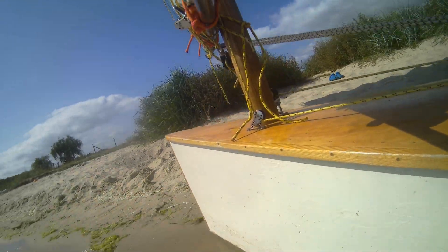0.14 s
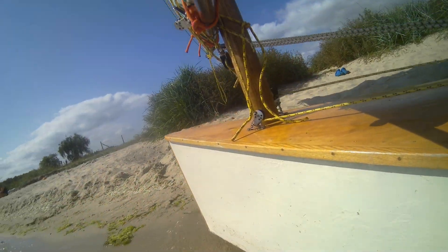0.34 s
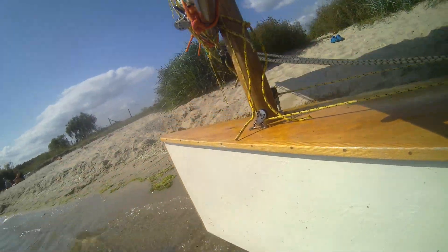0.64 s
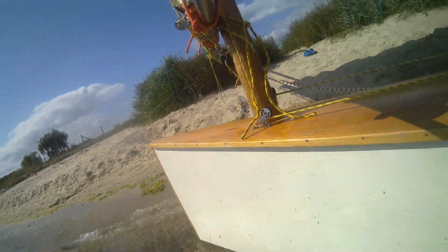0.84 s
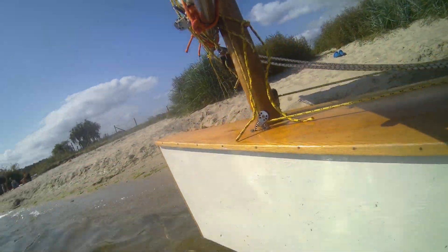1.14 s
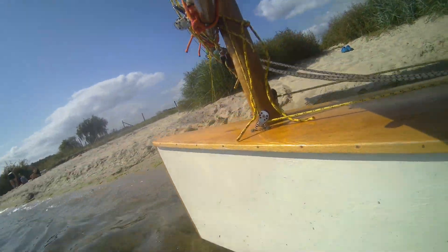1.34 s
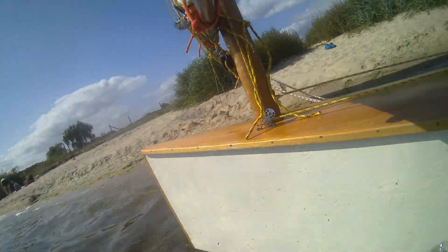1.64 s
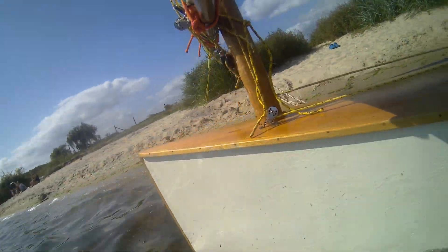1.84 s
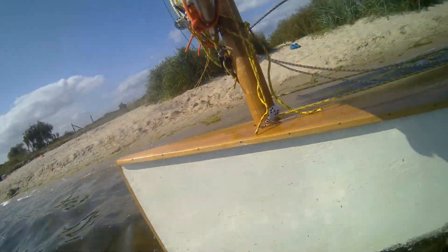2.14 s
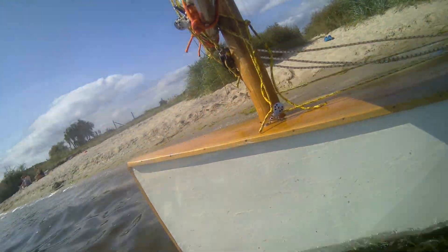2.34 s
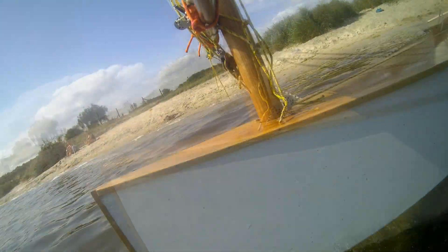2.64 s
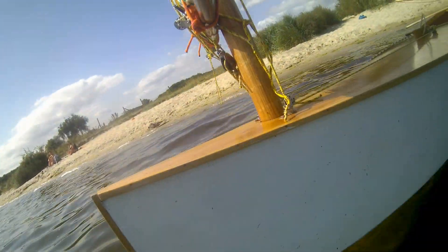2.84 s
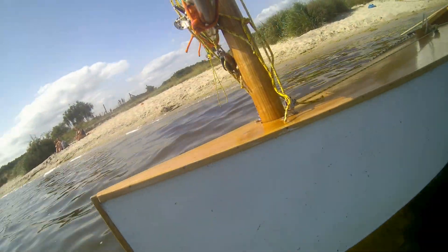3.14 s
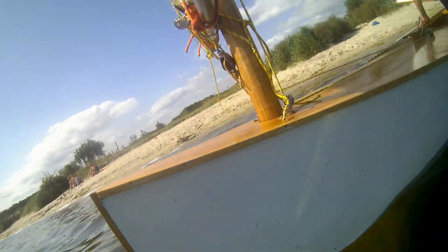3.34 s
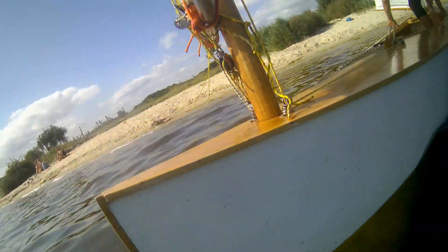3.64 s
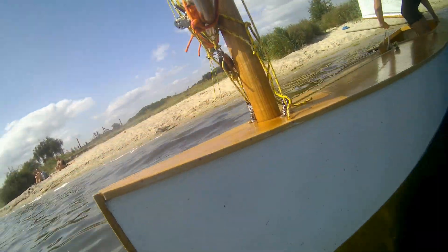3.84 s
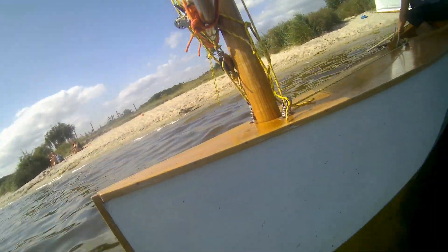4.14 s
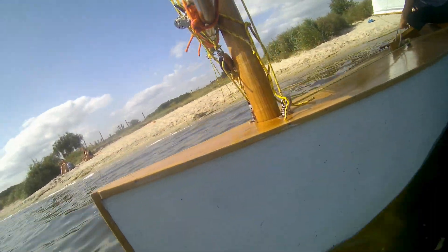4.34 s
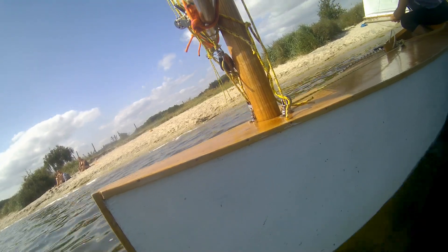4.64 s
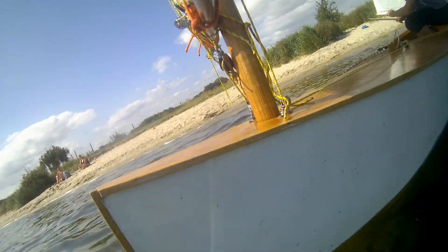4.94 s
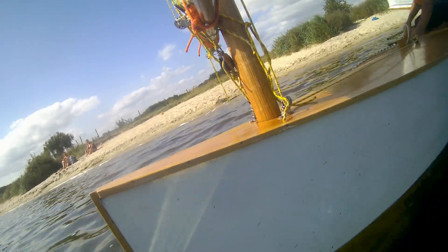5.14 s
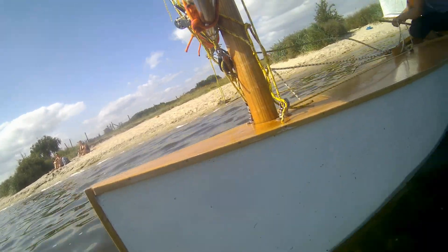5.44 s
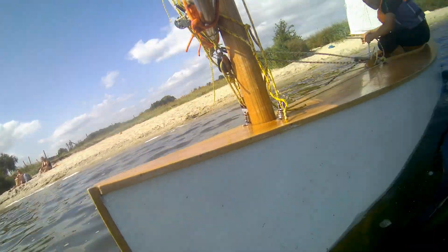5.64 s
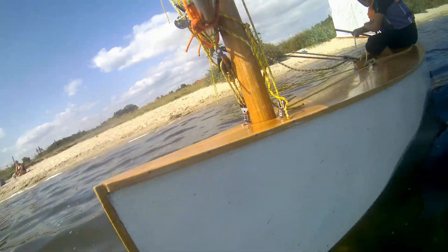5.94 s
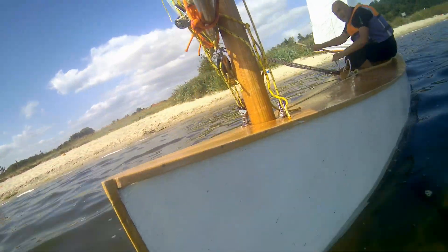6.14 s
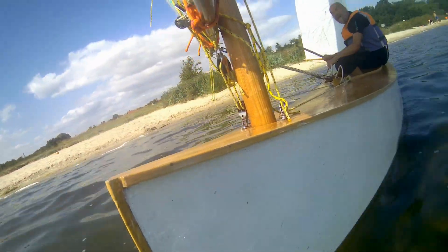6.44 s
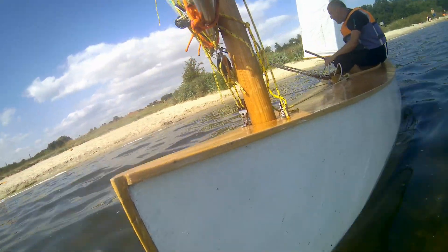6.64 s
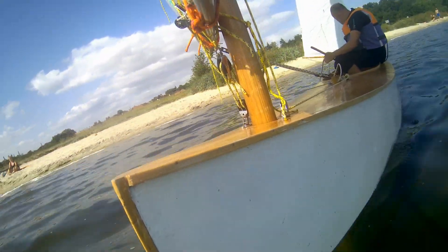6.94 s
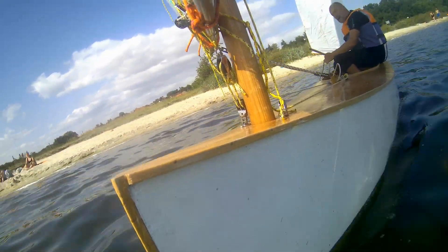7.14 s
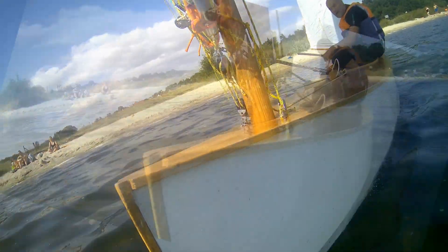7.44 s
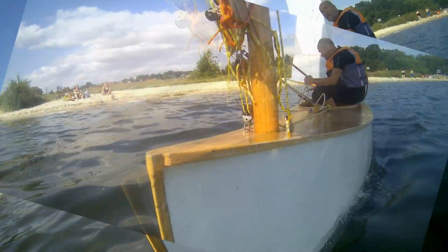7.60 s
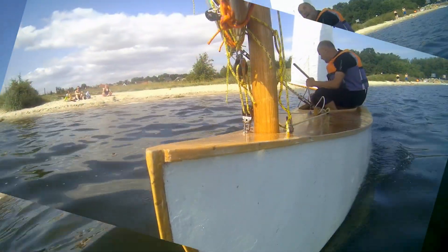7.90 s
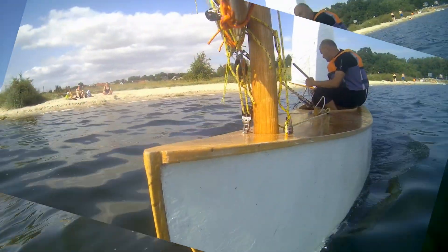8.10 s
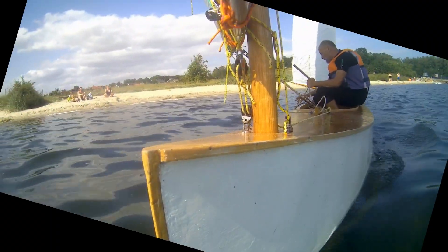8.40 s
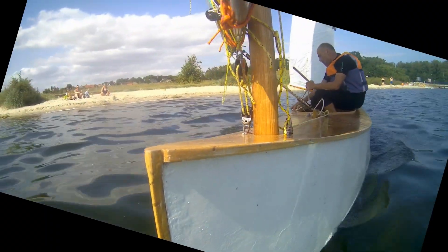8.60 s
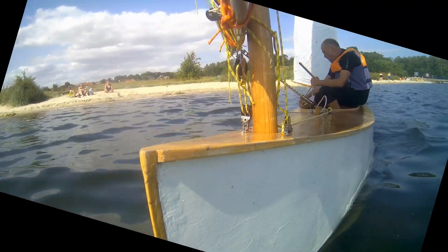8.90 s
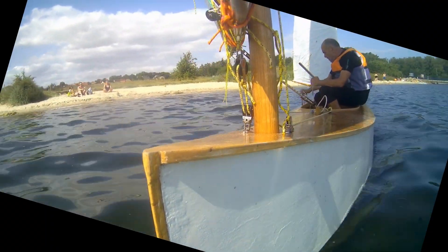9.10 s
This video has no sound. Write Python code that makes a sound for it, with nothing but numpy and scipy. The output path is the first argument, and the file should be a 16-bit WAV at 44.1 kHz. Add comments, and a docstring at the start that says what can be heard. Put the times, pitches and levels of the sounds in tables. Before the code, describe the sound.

Close, muffled handling sounds travel through the hull and mount of a small boat leaving a beach. Low scuffs and soft bumps come first, then a busy cluster of sharp ticks and dragging, more knocks, and a brief lull. Afloat, jolts set off short, very deep wobbling booms with hollow knocks. The treble drops out before the end; a barely audible hiss lies beneath.

```python
"""At the bow of a small wooden boat pushed off a beach, a sealed camera on a pole hears through its mount.
Dull bumps are soft pushes, sharp ticks are short cracks, and rubbing is gritty noise.
All three set the modes (natural tones) of the housing and mount ringing.
Once the boat is afloat, jolts make the pole sway with a deep boom: wandering sines over a low shudder.
A faint hiss of steady coloured noise lies below."""
import sys
import numpy as np
from scipy import signal
from scipy.fft import rfft, irfft
from scipy.io import wavfile

SR = 44100
rng = np.random.default_rng(int(sys.argv[2]) if len(sys.argv) > 2 else 0)


def gain_from_decibels(decibels):
    """Convert decibel values to linear amplitude factors."""
    exponent = np.asarray(decibels, float) / 20
    return 10 ** exponent


def generate_wav(sig):
    """Save sig (samples, or channels by samples) to the path in sys.argv[1] as 16-bit PCM at SR."""
    pcm = np.round(np.clip(np.atleast_2d(sig).T, -1, 1) * 32767).astype(np.int16)
    wavfile.write(sys.argv[1], SR, pcm)


N = 408525   # length in samples

LOW_BELOW_HZ, TREBLE_ABOVE_HZ = 500, 4300   # the modes fall into low, middle and treble


def in_time(rows):
    """Draws straight lines between the rows of a curve, giving each column at every sample."""
    s, *columns = np.transpose(rows)
    return [np.interp(np.arange(N) / SR, s, column) for column in columns]


def rms_one(x):
    """Scales a signal to an rms (average strength) of 1."""
    return x / np.sqrt(np.mean(x ** 2) + 1e-20)


def flicker(rate_hz):
    """Wanders by chance: straight lines join random points of spread 1, rate_hz points a second."""
    points = rng.standard_normal(int(N / SR * 200) + 2)
    return np.interp(np.arange(N) / SR * rate_hz, np.arange(len(points)), points)


def ring(force, hz, t60):
    """Rings one mode: a unit click starts a sine of height 1 that fades by 60 dB in t60 seconds."""
    shrink, turn = gain_from_decibels(-60 / (t60 * SR)), 2 * np.pi * hz / SR   # per sample
    return signal.lfilter([0, np.sin(turn)], [1, -2 * shrink * np.cos(turn), shrink ** 2], force + 1e-18)


def peaked(s, rise_s, fade_s):
    """Gain that swells to 1 at s and dies away, straight in dB; the times are for 20 dB."""
    age = np.arange(N) / SR - s
    level_db = np.where(age < 0, 20 * age / abs(rise_s), -20 * age / abs(fade_s))
    return gain_from_decibels(np.maximum(level_db, -200))


def hiss():
    """Steady coloured noise of the microphone and the air."""
    # Colour of the hiss. Each row: frequency in Hz, relative level in dB per Hz.
    colour_rows = [(30, -26), (60, 1), (270, 2), (1070, -3), (3700, -13), (6000, -20.5), (14000, -20),
                   (16000, -34.5)]
    hz, level_db = np.transpose(colour_rows)
    bins = np.fft.rfftfreq(N, 1 / SR) + 1
    colour = gain_from_decibels(np.interp(np.log(bins), np.log(hz), level_db))
    noise = irfft(colour * rfft(rng.standard_normal(N)), N)
    return gain_from_decibels(-75) * rms_one(noise)


def sway():
    """Each jolt starts a swing of its own, a near sine whose pitch wanders, with a rough shudder under it."""
    # Jolts that set the pole swaying. Each row: start in seconds, pitch in Hz, rms level of the swing in dB,
    # seconds held, seconds to fade 20 dB (signs of the times are ignored).
    jolts = [(6.965, 33, -34.5, 0.018, 0.38), (7.12, 48, -37, 0.084, -0.1), (7.411, 46.1, -43.5, 0.059, .1),
             (7.619, 43.2, -29.5, 0.06, 0.02), (7.71, 46.2, -35, 0.056, .16),
             (7.909, 44.4, -42.5, 0.016, 0), (7.99, 45.86, -46.5, 0.077, -0.5), (8.139, 46.4, -46, .1, 0.3),
             (8.3, 36.3, -42, 0.08, 0.26), (8.71, 46.3, -44.5, 0.1, .15), (8.935, 47.8, -35, 0.021, 0.16)]
    climb_hz_per_s, swell_s = 12, 0.024   # pitch climbs as the swing dies; time to swell 20 dB
    t, wander = np.arange(N) / SR, 1 + 0.04 * flicker(11)
    swing, power = np.zeros(N), np.zeros(N)
    for s, hz, db, held_s, fade_s in jolts:
        end = s + abs(held_s)
        held_then_fading = np.where(t < end, 1, peaked(end, 1, fade_s))
        size = gain_from_decibels(db) * np.where(t < s, peaked(s, swell_s, 1), held_then_fading)
        pitch = hz + climb_hz_per_s * np.clip(t - s, 0, .5)
        turns = np.cumsum(pitch * wander) / SR
        swing += np.sqrt(2) * size * np.cos(2 * np.pi * (turns - turns[int(s * SR)]))
        power += size ** 2
    band = signal.butter(5, [24., 64.], "band", fs=SR, output="sos")
    shudder = rms_one(signal.sosfilt(band, rng.standard_normal(N)))
    return swing + gain_from_decibels(-6.5) * np.sqrt(power) * shudder


def grit(per_s, spread_db, smooth_db, catch_s):
    """Catches of uneven size, each a short rasp, come at random over a smooth friction noise."""
    sizes = gain_from_decibels(spread_db * np.minimum(rng.exponential(1, N), 4))
    chance = per_s * gain_from_decibels(4.0 * flicker(25)) / SR   # the rate of catches wanders about per_s
    catches = sizes * (rng.random(N) < chance)
    pressure = signal.lfilter([1], [1, -np.exp(-1 / (catch_s * SR))], catches + 1e-18)
    return (rms_one(pressure) + gain_from_decibels(smooth_db)) * rng.standard_normal(N)


def rubbing_db():
    """Adds the power of the steady drag and all scuffs, giving low, middle and treble levels in dB."""
    # Steady drag on sand and through water, before the mode levels.
    # Each row: time in seconds, low level in dB, middle level in dB, treble level in dB.
    drag = [(0, -46.5, -57, -71), (.7, -63, -68.5, -84), (1.29, -53.5, -65, -78.5),
            (1.86, -47.5, -57.5, -68.5), (1.96, -42.5, -54.5, -67.5), (2.09, -46, -59, -68.5),
            (2.16, -37.5, -46.5, -67), (2.55, -42.5, -56, -64.5), (2.68, -61, -65, -70.5),
            (2.86, -37.5, -46.5, -68.5), (2.96, -60, -67, -75.5), (3.9, -55, -73, -82),
            (4.33, -52, -62, -80), (5.0, -79, -92, -100), (5.4, -77, -78.5, -90), (5.49, -48.5, -54, -78.5),
            (5.98, -60.5, -80, -82.5), (6.32, -77, -81.5, -81.5), (6.9, -56.5, -79, -84.5),
            (7.1, -66.5, -64, -92), (8.46, -80, -67.5, -90), (8.68, -80, -82.5, -99),
            (8.8, -80.5, -66, -99), (9.26, -68, -82.5, -100)]
    # Single scuffs of rope, hand and deck, before the mode levels. Each row: peak time in seconds,
    # low level in dB, seconds for the low part to fade 20 dB (sign ignored for the fade),
    # middle level in dB above the low one, treble level in dB above the low one.
    scuffs = [(0.149, -35.5, -0.02, -10, -39), (.32, -43, 0.41, -10.5, -28.5), (0.574, -50, 0.25, -2, -15),
              (0.617, -38, 0.07, -14.5, -17), (0.797, -47.5, 0.3, -10, -19.5),
              (0.997, -44.5, 0.25, -10.5, -18.5), (1.238, -55, -0.44, -3, -15.5),
              (2.581, -39, 0.22, -5.5, -24.5), (3.09, -36.5, 0.6, -6, -24.5),
              (3.456, -34.5, 0.09, -13.5, -38), (3.539, -35.5, 0.04, -11, -31),
              (3.66, -43.5, 1.16, -11, -32.5), (3.967, -37, 0.24, -11, -30.5),
              (4.233, -41.5, -0.23, -12, -34), (4.56, -52.5, -1, -10.5, -26.5),
              (5.095, -47.5, 0.15, -10.5, -25), (5.242, -51, 0.2, -3.5, -25),
              (5.306, -35.5, 0.07, -13.5, -40.5), (5.426, -39.5, 0.19, -7.5, -31),
              (5.681, -47, 0.31, -7, -29), (6.029, -32.5, 0.11, -11, -29.5), (6.162, -43, 0.1375, -10, -38),
              (6.357, -52.5, 0.33, -7.5, -19), (6.43, -51.5, 0.36, -12.5, -28), (6.63, -51, 0.13, -10, -27),
              (6.963, -38.5, 0.21, -11.5, -41.5), (7.348, -42.5, 0.22, -15, -30.5),
              (7.505, -38, 0.08, -5, -25), (7.616, -48.5, 0.6, -6.5, -33), (7.67, -48, 0.65, -27, -27),
              (7.964, -46.5, 0.34, -8, -26), (8.051, -62, 0.02, 7, -27), (8.195, -43, 0.21, -15.5, -30),
              (8.348, -37.5, 0.13, -15, -31), (8.71, -67.5, 0.7, -2, -35.5),
              (8.918, -60.5, 0.36, -3.5, -36)]
    rise_s, rise_share = 0.038, 0.013   # seconds to rise 20 dB, plus this share of the signed fade
    dulls = 1.24   # middle and treble rise and fade this much faster
    power = gain_from_decibels(np.array(in_time(drag))) ** 2
    for s, low_db, fade_s, middle_db, treble_db in scuffs:
        shape = peaked(s, rise_s + rise_share * fade_s, fade_s) ** 2
        power[0] += gain_from_decibels(low_db) ** 2 * shape
        upper_db = low_db + np.array([[middle_db], [treble_db]])
        power[1:] += gain_from_decibels(upper_db) ** 2 * shape ** dulls
    return 10 * np.log10(power)


def bumps(hz):
    """Soft pushes of a few ms that mostly reach the low modes, each with a strength of its own."""
    # Dull bumps. Each row: start in seconds, strength in dB before chance and the mode levels.
    bump_rows = [(0.069, -32), (0.109, -28.5), (0.144, -26), (0.277, -31), (0.316, -31), (0.422, -32.5),
                 (0.559, -27.5), (0.599, -28.5), (0.622, -35), (0.791, -38), (1.219, -38), (1.559, -32.5),
                 (1.774, -29), (1.806, -35.5), (2.173, -28.5), (2.275, -32), (2.472, -32.5), (2.593, -33),
                 (2.705, -32), (3.073, -29.5), (3.187, -31), (3.218, -26), (3.329, -28.5), (3.456, -36.5),
                 (3.535, -29), (3.642, -30), (3.962, -35), (4.014, -29), (4.19, -31.5), (4.235, -33),
                 (4.404, -45), (4.559, -43), (5.094, -33.5), (5.227, -39.5), (5.305, -45), (5.421, -30.5),
                 (6.039, -32.5), (6.148, -32.5), (6.413, -27.5), (6.61, -37), (6.941, -25), (7.495, -27),
                 (8.327, -28), (8.709, -49.5), (8.909, -44)]
    s, strength_db = np.transpose(bump_rows)
    force = np.zeros(N)
    force[(s * SR).astype(int)] = gain_from_decibels(strength_db - 4.5 + rng.normal(0, 1.88, len(s)))
    push = np.sin(2 * np.pi * hz * np.arange(int(1.5 * SR / hz)) / SR)   # one and a half cycles
    return signal.fftconvolve(force, push * 2 / len(push))[:N]


def rattled():
    """Every tick, then a weak, dull bounce at an uneven gap that favours another pitch."""
    # Sharp ticks, before the mode levels. Each row: start in seconds, strength in dB, favoured pitch in Hz,
    # treble in dB above the strength, broad crack in dB above the strength.
    tick_rows = [(0.075, -39, 1100, -34, -26), (0.086, -31, 604, -30, -23), (0.557, -29.5, 598, -21, -25),
                 (0.795, -39.5, 3600, -13, -8), (1.627, -40, 910, -6, -10.5), (1.775, -28, 970, -7.5, -27),
                 (1.806, -45, 1000, -7.5, -6), (1.959, -50, 1960, -15, -13), (2.001, -31, 910, -34, -14),
                 (2.112, -27.5, 894, -10, -17.5), (2.151, -39, 1040, -14, -5), (2.195, -41, 2660, 8, 0.5),
                 (2.258, -30, 1060, -7, -6.5), (2.294, -42, 756, 13.5, -2.5), (2.320, -36, 1040, 3, -10.5),
                 (2.465, -34.5, 1040, -13, -15), (2.555, -36.5, 2050, -10.5, 3),
                 (2.578, -30, 1040, -29, -6.5), (2.582, -21.5, 1440, -1.5, -6.5),
                 (2.726, -36.5, 3360, -39.5, -8.5), (2.753, -35, 1040, -33.5, -19),
                 (3.068, -34, 3250, 3.5, -12), (3.155, -28, 738, 2, -8), (3.228, -33, 1050, -6, -10),
                 (3.325, -37, 3384, -17.5, -38), (3.387, -40, 3420, -4, -14.5), (3.499, -44, 1500, -5, -3),
                 (3.534, -26.5, 1890, 3.5, -4.5), (3.956, -37, 1390, -22.5, -15),
                 (4.254, -47, 1500, -20, -10.5), (4.412, -60, 1090, 4.5, -16), (4.524, -45, 1060, -10, -34),
                 (4.562, -46, 895, -9, -21), (4.619, -53, 1060, -20, -25), (4.678, -55, 1060, -22, -24),
                 (5.066, -53, 3360, -20, -12), (5.088, -42, 1050, -20, -33),
                 (5.222, -43.5, 977, -38.5, -39.5), (5.274, -34, 941, -29.5, -34.5),
                 (5.412, -21.5, 1040, -2, -7), (5.418, -29, 2000, 2.5, -14.5), (5.536, -46.5, 3350, 3, -6),
                 (5.552, -46, 2080, -23.5, -10), (5.683, -44, 1120, -5, -7), (6.027, -45, 1130, 5, 3.5),
                 (6.04, -34, 1360, 0, -5), (6.144, -26, 1150, -5, -21.5), (6.413, -29.5, 1158, -1, -14),
                 (6.607, -41.5, 1044, -14.5, -17), (6.948, -24.5, 595, -12, -10.5),
                 (6.983, -38.5, 860, -26, -11), (7.334, -44, 993, -5, -9.5), (7.496, -28, 1150, 0.5, -28.5),
                 (7.593, -40, 2440, -32, -11), (7.952, -44.5, 1101, 10, -7.5),
                 (8.049, -43, 2240, -33.5, -3), (8.329, -39, 1390, -21.5, -18),
                 (8.693, -49.5, 2323, -53.5, -9), (8.91, -44.5, 1280, -46.5, -21.5)]
    gap_s, loss_db = .03, 16.5   # average gap and loss of strength of a bounce
    rows, luck = list(tick_rows), rng.random((len(tick_rows), 2))
    for (s, strength_db, hz, treble_db, crack_db), (gap, bend) in zip(tick_rows, luck):
        bounce_s = s + gap_s * (.5 + gap)
        bounce_hz = hz * 2 ** (bend - .5)
        rows.append((bounce_s, strength_db - loss_db, bounce_hz, treble_db - 11.0, crack_db - 8.0))
    return rows


def ticks(hz, contacts):
    """Contacts of a few ms, harder ones longer: a broad, ever new crack and a ring of modes near its pitch."""
    afloat_s, softer, metal_hz = 6.94, 3.7, 5080   # contacts last softer times longer a while after afloat_s
    force, t = np.zeros(N), np.arange(900) / SR
    chatter = rng.standard_normal((len(contacts), len(t)))   # micro-impacts
    for (s, strength_db, favoured_hz, treble_db, crack_db), shakes in zip(contacts, chatter):
        longer = softer if s > afloat_s + .6 else 1
        age = t / (0.0011 * gain_from_decibels(0.5 * (strength_db + 27.0)) * longer)
        pressure = age ** 1.11 * np.exp(-age)
        crack = rms_one(shakes * pressure) / np.sqrt(len(t))
        if abs(hz / metal_hz - 1) < .06:   # a small metal part rings only under the hardest blows
            burst = gain_from_decibels(9 * (strength_db + 22) - 7.0) * np.sign(shakes[0]) * (t == 0)
        elif hz > TREBLE_ABOVE_HZ:
            burst = gain_from_decibels(treble_db + 0.5) * crack
        else:   # the favoured ring builds up over the contact
            swing = 2 * pressure / pressure.sum() * np.sin(2 * np.pi * hz * t)
            nearness = gain_from_decibels(-30.0 * abs(np.log2(hz / favoured_hz)))   # 30 dB less per octave away
            burst = nearness * swing + gain_from_decibels(crack_db - 6.0 + 4.3 * shakes[-1]) * crack
        at = int(s * SR)
        force[at:at + len(t)] += gain_from_decibels(strength_db - 8.5) * burst[:N - at]
    return force


def mount():
    """All contacts drive the same modes; rubbing damps them and wanders, most catches in one mode only."""
    # Modes of housing and mount. Each row: pitch in Hz, level when struck in dB,
    # seconds to fade 60 dB when struck, level when rubbed in dB before a shared trim.
    modes = [(67.9, -16, 0.416, -10.5), (97.7, -26.5, 0.18, -10), (128, -7, 0.09, -8.5),
             (199.7, 3, 0.13, 2.5), (280.5, -6, 0.042, -5.5), (389, -13, 0.1, -8.5),
             (599, -2.5, 0.02, -9.5), (842, 10, 0.011, -9.5), (1040, 1.5, 0.053, -9),
             (1440, 12, 0.0089, -8.5), (1966, 5.5, 0.0187, -20.5), (2230, 6.5, 0.023, -24),
             (2780, 10.5, 0.0037, -13), (3360, 8, 0.015, -16.5), (5068, -21, 0.12, -25),
             (5580, -1.5, 0.0023, 0), (7700, -6, 0.0032, -1.5), (8730, -12.5, 0.0044, -2),
             (12040, -15, 0.002, -7.5)]
    # The hull sounds more hollow once it floats free. Each row: time in seconds,
    # dB taken from bumps in the drum modes and given to the low modes above them.
    hollow_rows = [(0, 2), (6.9, -0.5), (6.95, 5), (8.4, 1), (8.5, 10.5), (9.26, 13)]
    # The deepest modes, strongest while the hull is hauled. Each row: time in seconds, added level in dB.
    deep_rows = [(.8, -5), (2, 3), (3.8, 4.5), (5, -10), (5.8, 1)]
    drum_below_hz = 250
    reach_db, dull_db_per_octave = -8, 18.5   # what a bump leaves in the middle modes
    low_db, middle_db, treble_db = rubbing_db()
    scuff, sand = grit(170., 3.4, -3.0, 0.0054), grit(110.0, 2.1, -0.37, 0.0052)
    together = flicker(35)   # one wander shared by the rubbing in all modes
    hollow_db, = in_time(hollow_rows)
    deep_db, = in_time(deep_rows)
    contacts = rattled()
    out = np.zeros(N)
    for hz, struck_db, t60, rubbed_db in modes:
        if hz < drum_below_hz:
            struck = gain_from_decibels(-hollow_db) * bumps(hz)
            rubbing = rng.standard_normal(N)
            rub_db = low_db + 1.5 * flicker(20)
            if hz < drum_below_hz / 2:
                struck, rub_db = gain_from_decibels(deep_db) * struck, rub_db + deep_db
        elif hz < LOW_BELOW_HZ:
            struck = gain_from_decibels(hollow_db) * bumps(hz)
            rubbing = np.roll(scuff, rng.integers(N))   # shifted, so its catches are this mode's own
            rub_db = middle_db + hollow_db * (300 / hz) ** 2.2 + 2.5 * flicker(14)
        elif hz < TREBLE_ABOVE_HZ:
            bump_db = reach_db - dull_db_per_octave * np.log2(hz / LOW_BELOW_HZ)
            struck = ticks(hz, contacts) + gain_from_decibels(bump_db) * bumps(hz)
            rubbing = 0.35 * scuff + 1.47 * np.roll(scuff, rng.integers(N))   # shared and own catches
            rub_db = middle_db + 5.16 * flicker(30)
        else:
            struck, rubbing = ticks(hz, contacts), sand
            rub_db = treble_db + 5.0 * flicker(25)
        out += gain_from_decibels(struck_db) * ring(struck, hz, t60)
        rub_gain = gain_from_decibels(rub_db + rubbed_db + 2.6 * together - 6.5)
        out += rub_gain * rms_one(ring(rubbing, hz, 0.61 * t60))   # rubbing shortens the ring
    return signal.sosfilt(signal.butter(4, 52, "high", fs=SR, output="sos"), out)   # cut below 52 Hz


def scene():
    """Adds hiss, sway and all the sound of the mount in one channel."""
    return (mount() + sway() + hiss())[None]


def top_cut(x):
    """Nothing passes above the cut-off."""
    return signal.sosfilt(signal.butter(12, 16500, fs=SR, output="sos"), x)


def record(dry):
    """Near the end the treble drops away: a steep low-pass takes over."""
    treble_gone_s, treble_gone_hz = 8.42, 4600   # 45 dB down from this frequency up
    low_pass = signal.cheby2(10, 45, treble_gone_hz, fs=SR, output="sos")
    dull = signal.sosfilt(low_pass, dry)
    late = np.arange(N) / SR > treble_gone_s
    return top_cut(np.where(late, dull, dry))


dry = scene()
out = record(dry)
generate_wav(out)
```